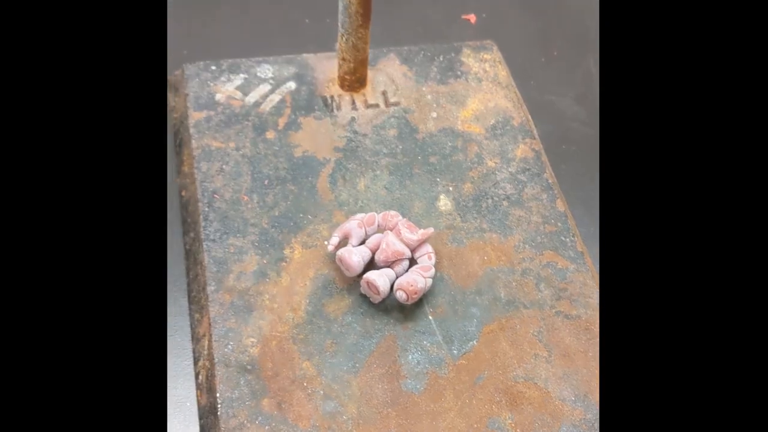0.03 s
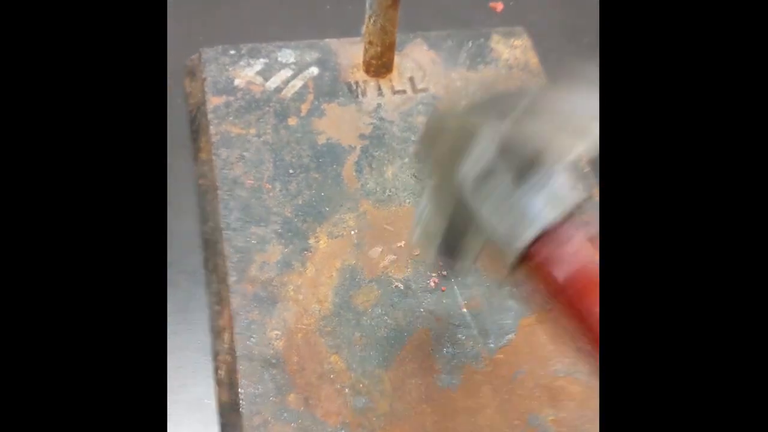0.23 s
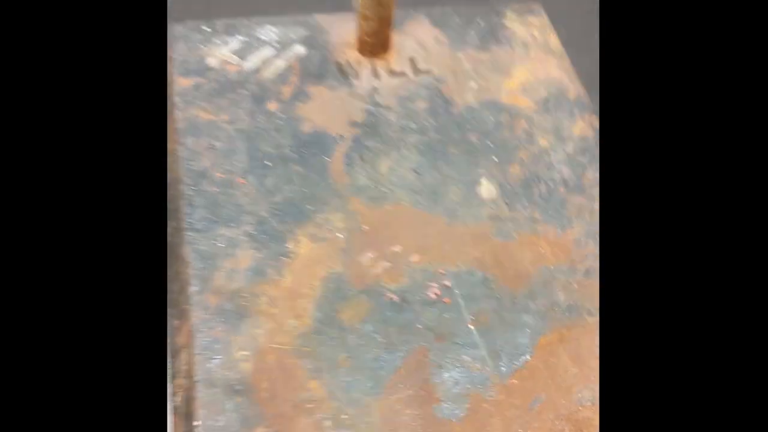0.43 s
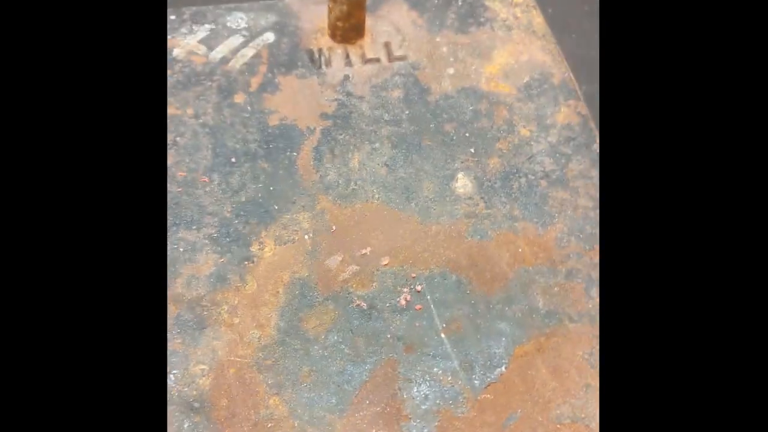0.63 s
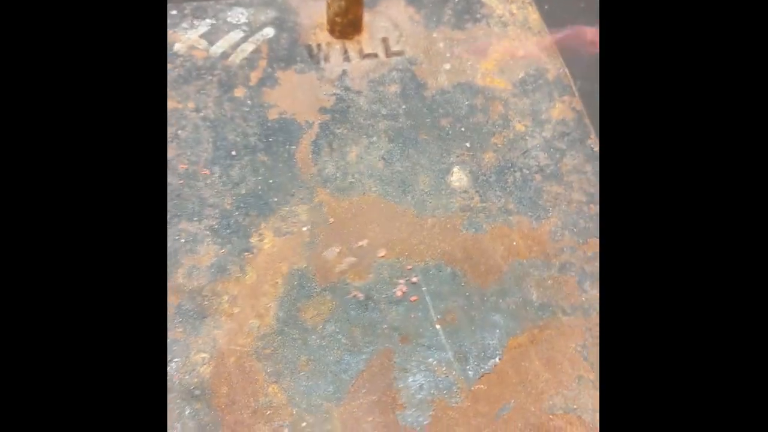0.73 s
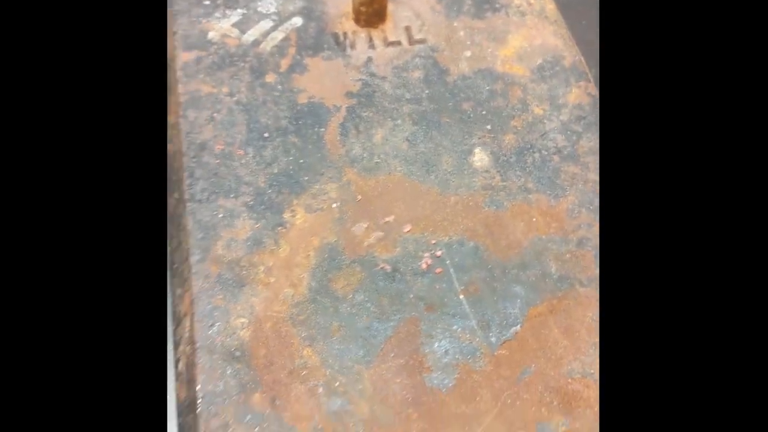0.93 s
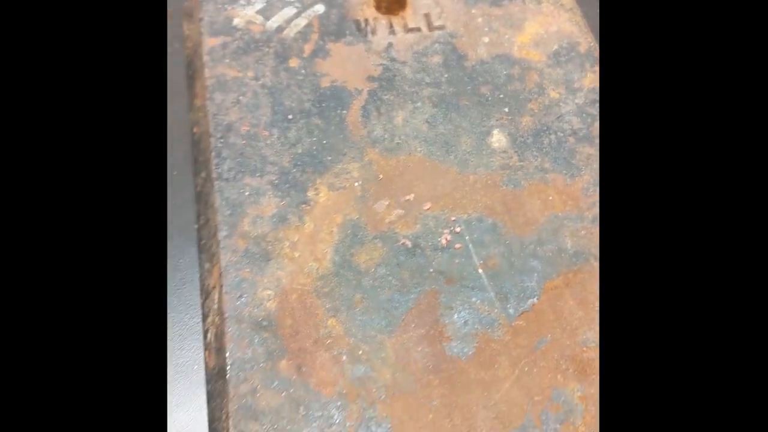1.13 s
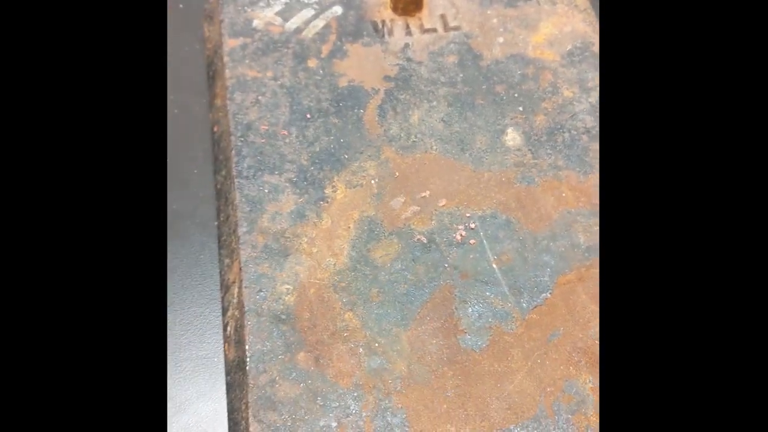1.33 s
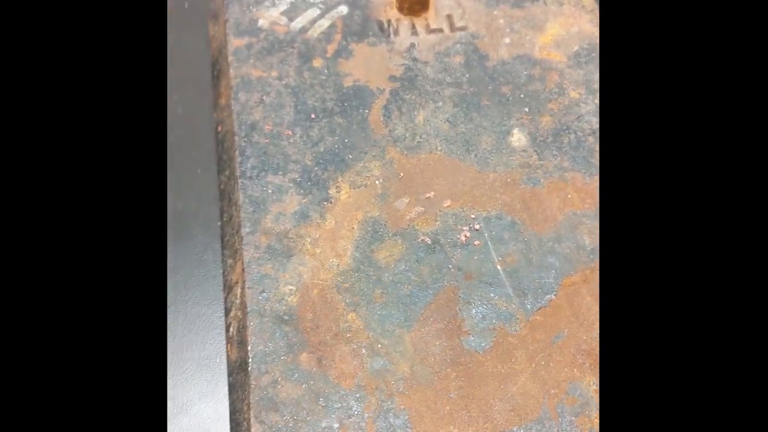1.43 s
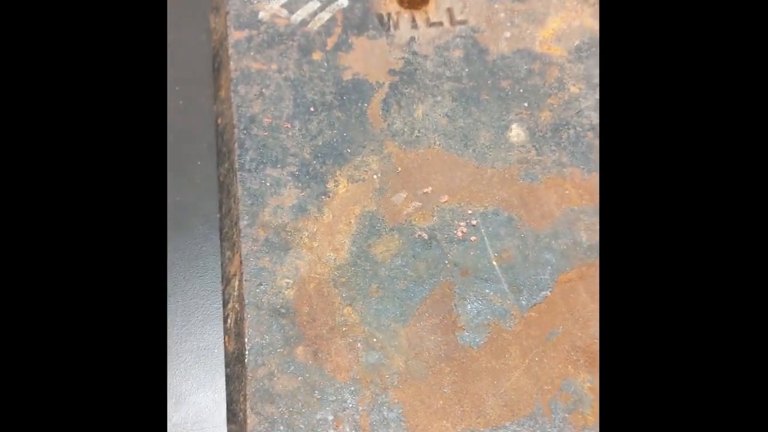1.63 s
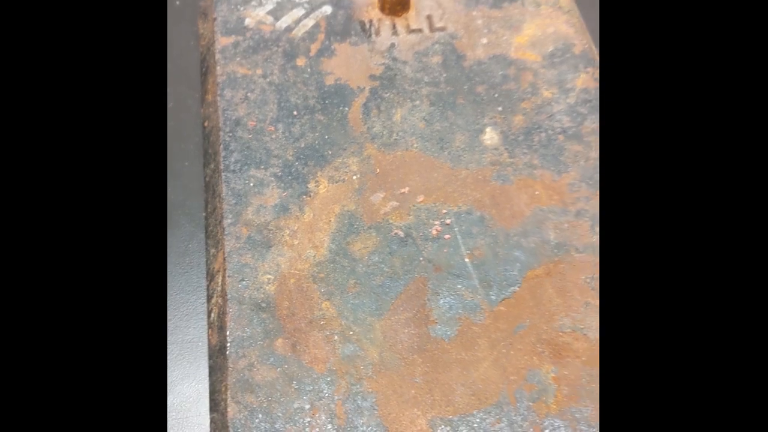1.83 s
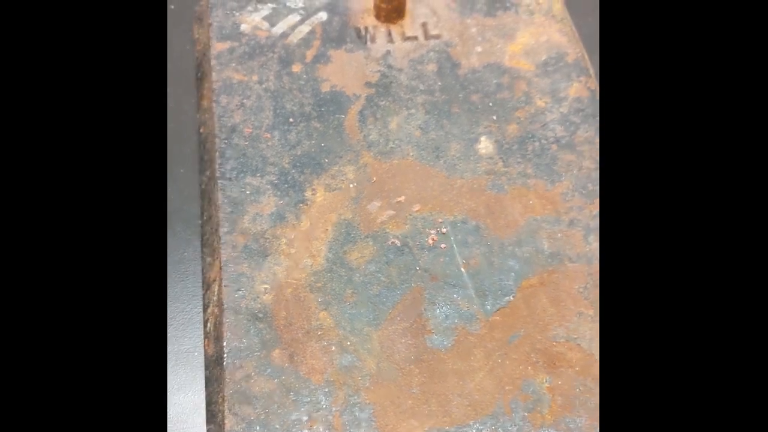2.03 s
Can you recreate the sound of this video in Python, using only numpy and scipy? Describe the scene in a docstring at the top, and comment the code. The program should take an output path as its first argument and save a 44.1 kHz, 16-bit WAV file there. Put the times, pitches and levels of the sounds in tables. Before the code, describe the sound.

A hammer smashes a frozen toy on a steel plate at about 0.25 seconds: a close, sharp crunching crack with a low thud and short metallic ring. Chunks clatter down until 0.7 seconds while icy crumbs tick. From 1.1 seconds, small pieces skitter and scrape with a gritty, squeaky hiss, thinning to faint tinkles by 2 seconds. Low ventilation rumbles throughout in the hard-walled room.

```python
"""Over a low ventilation rumble, a hammer smashes a frozen toy on a steel plate, close by.
The toy bursts in swarms of tiny cracks, the plate thuds on its support and the steel rings in its modes.
Chunks clatter down, icy crumbs tick, and small pieces skitter and scrape with a gritty, squeaky hiss.
A hard-walled room answers; a limiter flattens the blow."""
import sys
import numpy as np
from scipy import signal
from scipy.fft import rfft, irfft
from scipy.io import wavfile
from scipy.ndimage import uniform_filter1d

SR = 44100
rng = np.random.default_rng(int(sys.argv[2]) if len(sys.argv) > 2 else 0)


def wav_record(signal):
    """Record a signal, one row per channel, as 16-bit PCM in the file named by sys.argv[1]."""
    frames = np.transpose(np.atleast_2d(signal))
    bounded = np.clip(frames, -1, 1)
    # unit amplitude maps onto the largest positive 16-bit level
    quanta = np.round(bounded * 32767).astype(np.int16)
    wavfile.write(sys.argv[1], SR, quanta)


N = 92610


def amp(db):
    """Decibels to gain."""
    return 10 ** (np.asarray(db) / 20)


def unit_rms(x):
    """Scales to rms 1."""
    return x / np.sqrt(np.mean(x ** 2) + 1e-20)


def decay(t, t60_s):
    """Exponential fall, 60 dB in t60_s."""
    return np.exp(-np.log(1000) * t / t60_s)


def curve(points, hz):
    """Interpolates a table on a log-frequency axis."""
    freq_hz, value = np.transpose(points)
    return np.interp(np.log(hz + 1), np.log(freq_hz + 1), value)


def envelope(points):
    """Gain per sample from (time_s, level_db) points."""
    return amp(np.interp(np.arange(N) / SR, *np.transpose(points)))


def pan(db):
    """Stereo gains for a left-minus-right level difference."""
    gains = amp(np.array([np.atleast_1d(db), -np.atleast_1d(db)]) / 2)
    return gains / np.sqrt((gains ** 2).mean(0))


def place(start_s, sound):
    """Sets a stereo sound on the scene's timeline."""
    return np.pad(sound, ((0, 0), (round(start_s * SR), N)))[:, :N]


def colour(x, db_at):
    """Filters by a gain curve in dB over frequency."""
    return irfft(rfft(x) * amp(db_at(np.fft.rfftfreq(x.shape[1], 1 / SR))), x.shape[1])


def burst(db_at, rise_s, hold_s, t60_s, grain_db, ripple_db=3.5, ripple_hz=89.36):
    """A swarm of tiny uneven clicks swells, holds and dies, coloured by many small resonances."""
    t = np.arange(SR // 2) / SR
    grain_gain = amp(grain_db * np.repeat(rng.standard_normal(len(t)), 25)[:len(t)])
    ripple = rng.standard_normal(2000)
    spectrum = lambda f: db_at(f) + ripple_db * np.interp(f / ripple_hz, np.arange(len(ripple)), ripple)
    grains = unit_rms(colour(grain_gain * rng.standard_normal((2, len(t))), spectrum))
    return grains * np.minimum(t / rise_s, 1) * decay(np.maximum(t - hold_s - rise_s, 0), t60_s)


# air noise spectrum: freq_hz, level_db
AIR_SPECTRUM = [(25, -6), (84, 4.5), (150, -7.5), (212, -4), (270, -10.5), (373, -8.5), (530, -18),
                (700, -14.5), (1000, -21), (1260, -18.5), (2500, -28.5), (5000, -35.5), (7000, -48),
                (16000, -54.5)]
# left-right likeness of the air: freq_hz, correlation
AIR_CORRELATION = [(30, 1), (120, 0.98), (300, 0.86), (700, 0.085), (2000, 0), (16000, 0.28)]
# hums: pitch_hz, level_db
HUMS = [(204, -52), (357, -53), (1235, -64.5)]
# swell of the lowest hum: time_s, gain_db
HUM_SWELL = [(0, -1.5), (1.33, -3), (1.42, 9.5), (1.6, 2.5), (1.75, -7), (2.049, 9)]


def ventilation(noise_db=-41, hum_width_hz=12):
    """Air rumbles, alike on both sides in the bass, with wavering hums; the lowest one swells."""
    hz = np.fft.rfftfreq(N, 1 / SR)
    left, independent = rfft(rng.standard_normal((2, N)))
    correlation = curve(AIR_CORRELATION, hz)
    right = correlation * left + np.sqrt(1 - correlation ** 2) * independent
    rumble = unit_rms(irfft(np.array([left, right]) * amp(curve(AIR_SPECTRUM, hz)), N))
    hums = []
    for pitch_hz, level_db in HUMS:
        band = rfft(rng.standard_normal(N)) / (1 + (2 * (hz - pitch_hz) / hum_width_hz) ** 2)
        hums.append(amp(level_db) * unit_rms(irfft(band, N)))
    return amp(noise_db) * rumble + hums[0] * envelope(HUM_SWELL) + sum(hums[1:])


# crumb tick spectrum: freq_hz, level_db
CRUMB_SPECTRUM = [(300, -27), (2000, 1), (6000, -4), (11000, 0), (15000, 1)]
# patter envelope: time_s, level_db
CRUMB_LEVELS = [(0, -71), (0.183, -54.5), (0.559, -45), (.62, -67), (.85, -51), (.93, -65), (1.96, -65),
                (2.06, -57.5)]


def crumbs(ticks_per_s=790):
    """Fine icy crumbs tick at random."""
    ticks = (rng.random((2, N)) < ticks_per_s / SR) * rng.standard_normal((2, N))
    return unit_rms(colour(ticks, lambda f: curve(CRUMB_SPECTRUM, f))) * envelope(CRUMB_LEVELS)


CRACK_RISE_S, CRACK_GRAIN_DB = .0011, 2.5
# crack spectrum: freq_hz, level_db
CRACK_SPECTRUM = [(40, -30), (150, -5.5), (330, -1.5), (700, -3), (1500, -3.5), (2800, -2.5), (5000, -4),
                  (7500, -7), (11000, -4), (16000, -12.5)]
# contacts: start_s, level_db, bass_db, treble_db, hold_s, t60_s
CONTACTS = [(0.2449, -3.5, 6.5, 4, 0.0067, 0.03), (0.294, -15, 8, -21, 0.0046, 0.053),
            (0.3372, -20.5, 6, -15, 0.003, 0.061), (0.377, -11.5, 1.5, -8, 0.0061, 0.078),
            (0.3935, -12, 4, 4, 0.0028, 0.028), (0.443, -11.5, -10, -8.5, 0.0042, 0.05),
            (0.508, -25.5, -5, -8, 0.0035, 0.036), (0.638, -15, -10.5, -5.5, 0.0051, 0.062),
            (0.648, -13, -5, -2.5, 0.0043, 0.07), (0.683, -30.5, -12, 10, 0.0022, 0.1),
            (0.921, -35, -2.5, -5, 0.0053, 0.042), (1.056, -39.5, 5, 2, 0.0026, 0.045),
            (1.147, -31.5, -21, 0.5, 0.01, 0.032), (1.857, -44, -4, 11, 0.0028, 0.18),
            (2.025, -46.5, 3, -2, .002, 0.04)]


def cracks(bass_hz=650, middle_hz=2090, treble_hz=10000):
    """The toy bursts and its pieces strike bench and floor, each contact a swarm of tiny cracks."""
    out = np.zeros((2, N))
    for start_s, level_db, bass_db, treble_db, hold_s, t60_s in CONTACTS:
        tilt = [(bass_hz, bass_db), (middle_hz, 0), (treble_hz, treble_db)]
        spectrum = lambda f: curve(CRACK_SPECTRUM, f) + curve(tilt, f)
        crack = burst(spectrum, CRACK_RISE_S, hold_s, t60_s, CRACK_GRAIN_DB)
        out += place(start_s, amp(level_db) * crack)
    return out


THUMP_START_S, PUSH_S, DRAUGHT_PAN_DB = .2465, .0053, 10.5
# modes of the plate's support: pitch_hz, level_db, t60_s
SUPPORT_MODES = [(93, -12.5, 0.12), (134.3, -3, 0.12)]


def thump(level_db=-10.5, bounce_pan_db=5.5):
    """The hammer's push of air, and the plate bouncing on its support."""
    t = np.arange(SR // 2) / SR
    push = (1 - t / PUSH_S) * np.exp(-t / PUSH_S) * np.minimum(t / .0005, 1)
    bounce = sum(amp(db) * decay(t, t60_s) * np.sin(2 * np.pi * hz * t) for hz, db, t60_s in SUPPORT_MODES)
    thud = pan(DRAUGHT_PAN_DB) * push + pan(bounce_pan_db) * bounce
    return place(THUMP_START_S, amp(level_db) * thud)


# draught spectrum: freq_hz, level_db
DRAUGHT_SPECTRUM = [(50, 0), (170, -7.5), (900, -70)]


def draught(level_db=-21.5):
    """The draught of the swing buffets the microphone, mostly on the left."""
    gust = burst(lambda f: curve(DRAUGHT_SPECTRUM, f), rise_s=PUSH_S, hold_s=0, t60_s=.25, grain_db=0)
    return place(THUMP_START_S, amp(level_db) * pan(DRAUGHT_PAN_DB) * gust)


# modes of each ringing body: pitch_hz, level_db, t60_s, pan_db
PLATE = [(292, -20, .25, -2), (1388, 0, .15, 5), (1950, -11, .15, 0), (1991, -11, .15, 1),
         (2551, -10, .15, -8), (2685, -10, .15, -3), (2726, -9, .15, -2), (2771, -7, .14, -4),
         (2923, -9, .15, -4), (2987, -7, .14, -8), (3431, -13, .13, 2), (4521, -17, .12, 9),
         (4860, -15, .15, 3), (5317, -6.5, .1, 7), (7666, -15, .1, 5), (10230, -20, .15, 0)]
BENCH = [(298, 0, .22, -2), (1380, -6, .2, -9), (2042, -2, .14, 1), (2678, -6, .17, -8)]
CHUNK = [(1091, -14, .08, 0), (1783, -2, .07, -7), (1883, -6, .09, -7), (2156, .5, .125, 1),
         (3280, -12, .12, 2), (5025, -4, .05, 3)]
SHARD = [(360, -3, .13, -3), (1225, -2, .06, -4), (1665, -4, .09, -7), (2140, -6, .12, 0),
         (2822, -3, .08, -4), (3222, -4, .08, 4), (3450, -3, .08, 0), (4775, 3, .06, 0), (4900, 2, .055, 0),
         (5982, -3, .055, 7)]
SPLINTER = [(10030, 2.5, .18, -3), (13080, -3, .26, -3)]
CHIP = [(1690, -9, .07, -2), (2210, -1, .06, -2), (3300, 3, .045, 0)]
SLIVER = [(4420, 0, .24, 2), (4516, 0, .22, -2), (4690, -3, .18, -2), (4807, -2, .24, 1),
          (7040, -1, .19, 3), (7115, -3.5, .28, 3), (7450, -6, .18, 0), (11130, -2.5, .17, -1),
          (14320, -6, .17, -5)]
# ringing blows: start_s, level_db, rise_s, modes
BLOWS = [(.251, 0, .006, PLATE), (.380, -22, .004, BENCH), (.444, -10, .002, CHUNK),
         (.641, -17, .004, SHARD), (.684, -34, .003, SPLINTER), (1.149, -33, .004, CHIP),
         (1.717, -36, .02, SLIVER)]


def rings(waver_depth=.33, waver_hz=45, mic_gap_s=.00002):
    """Struck steel and tumbling pieces ring in their own modes, wavering in level and phase."""
    out, t = np.zeros((2, N)), np.arange(SR) / SR
    mic_t = t - np.array([[0], [mic_gap_s]])
    for start_s, level_db, rise_s, modes in BLOWS:
        attack = np.minimum(t / rise_s, 1)
        for pitch_hz, mode_db, t60_s, pan_db in modes:
            knots = rng.standard_normal((200, 2)) @ [1, 1j]
            waver = 1 + waver_depth * np.interp(t * waver_hz, np.arange(len(knots)), knots)
            tone = (waver * np.exp(2j * np.pi * (pitch_hz * mic_t + rng.random()))).real
            out += place(start_s, amp(level_db + mode_db) * pan(pan_db) * attack * decay(t, t60_s) * tone)
    return out


# spectrum of the crush under the hammer head: freq_hz, level_db
CRUNCH_SPECTRUM = [(450, -2), (800, -10), (2000, -0.5), (2500, -0.5), (3200, 0), (4200, -7.5), (5400, -7.5),
                   (8000, -18), (16000, -21)]


def crunch(start_s=.252, level_db=-7, hold_s=.03, t60_s=.08):
    """The hammer follows through and grinds the frozen toy: a dense, hard crush."""
    crush = burst(lambda f: curve(CRUNCH_SPECTRUM, f), CRACK_RISE_S, hold_s, t60_s, CRACK_GRAIN_DB)
    return place(start_s, amp(level_db) * crush)


# scrape spectrum: freq_hz, level_db
SKID_SPECTRUM = [(100, -32), (1000, -16), (2000, -9.5), (4000, -1), (6500, 0), (10000, 2.5), (13500, 1),
                 (16000, -0.5)]
# sliding pieces: start_s, level_db, rise_s, hold_s, t60_s, squeak_hz, squeak_db, treble_db
SKIDS = [(1.103, -32, 0.0085, .004, 0.31, 11700, 6.5, 5.5),
         (1.153, -21.5, 0.0024, 0.021, 0.11, 9750, 3, 3.5), (1.372, -41, 0.0075, 0.015, 0.23, 5940, 15, -4),
         (1.434, -46, 0.098, 0.11, 0.2, 3740, -1, -37), (1.45, -46.5, 0.039, 0.19, .25, 14000, 7, 3),
         (1.628, -40.5, 0.0085, 0.015, 0.23, 14400, 0, 28),
         (1.665, -40.5, 0.0084, 0.056, 0.072, 3240, 5.5, -28),
         (1.714, -34, 0.0035, 0.022, 0.19, 4370, 3.5, -6)]


def skids(squeak_width_oct=.26):
    """Pieces skitter and scrape: gritty hiss, most with one broad squeak."""
    out = np.zeros((2, N))
    for start_s, level_db, rise_s, hold_s, t60_s, squeak_hz, squeak_db, treble_db in SKIDS:
        tilt = [(4000, 0), (12000, treble_db)]
        squeak = lambda f: squeak_db * np.exp(-(np.log2((f + 1) / squeak_hz) / squeak_width_oct) ** 2)
        spectrum = lambda f: curve(SKID_SPECTRUM, f) + curve(tilt, f) + squeak(f)
        scrape = burst(spectrum, rise_s, hold_s, t60_s, grain_db=3, ripple_db=2)
        out += place(start_s, amp(level_db) * scrape)
    return out


# room decay: freq_hz, t60_s
ROOM_DECAY = [(100, 0.33), (400, 0.29), (1000, 0.6), (2100, 0.63), (3200, 0.51), (5000, 0.54), (9000, 0.37),
              (16000, 0.33)]


def room(x, delay_s=.008):
    """Hard walls return sparse reflections of random sign, each band dying at its own speed."""
    taps = rng.choice([-1., 1.], (2, SR)) * (rng.random((2, SR)) < .1)
    hz, t, bands = signal.stft(taps, SR, nperseg=256)
    _, tail = signal.istft(bands * decay(t, curve(ROOM_DECAY, hz)[:, None]), SR, nperseg=256)
    response = place(delay_s, tail / np.linalg.norm(tail[0]))
    return signal.fftconvolve(x, response, axes=1)[:, :N]


def scene():
    """All sources, with the room's answer to the breaking, ringing and debris."""
    breaking = cracks() + crunch()
    ringing = rings()
    debris = skids() + crumbs()
    reverb = room(amp(-12) * breaking + amp(-18.5) * ringing + amp(-7.5) * debris)
    return breaking + ringing + debris + reverb + thump() + draught() + ventilation()


# microphone imbalance: freq_hz, pan_db
MIC_BALANCE = [(40, -3.5), (120, 3.5), (300, -3.5), (800, 0), (2000, -5), (3300, 0), (4500, 0.5), (8500, 7),
               (10500, -1.5), (12500, -5), (16000, -10)]
LIMIT_DB, RELEASE_DB_PER_S, CLIP_CEILING, LOWPASS_HZ = -8, 200, .8, 15900


def record(dry):
    """Two unlike microphone ports, a fast limiter, soft clipping and the band limit."""
    mics = irfft(rfft(dry) * pan(curve(MIC_BALANCE, np.fft.rfftfreq(N, 1 / SR))), N)
    power_db = 10 * np.log10(abs(uniform_filter1d((mics ** 2).mean(0), size=180)) + 1e-12)
    release_db = np.arange(N) * RELEASE_DB_PER_S / SR
    peak_db = np.maximum.accumulate(power_db + release_db) - release_db
    reduction_db = uniform_filter1d(np.maximum(peak_db - LIMIT_DB, 0), size=90)
    limited = mics / amp(reduction_db)
    clipped = limited / (1 + (limited / CLIP_CEILING) ** 6) ** (1 / 6)
    lowpass = signal.firwin(255, LOWPASS_HZ, window=("kaiser", 9), fs=SR)
    return signal.oaconvolve(clipped, lowpass[None], "same")


dry = scene()
out = record(dry)
wav_record(out)
```